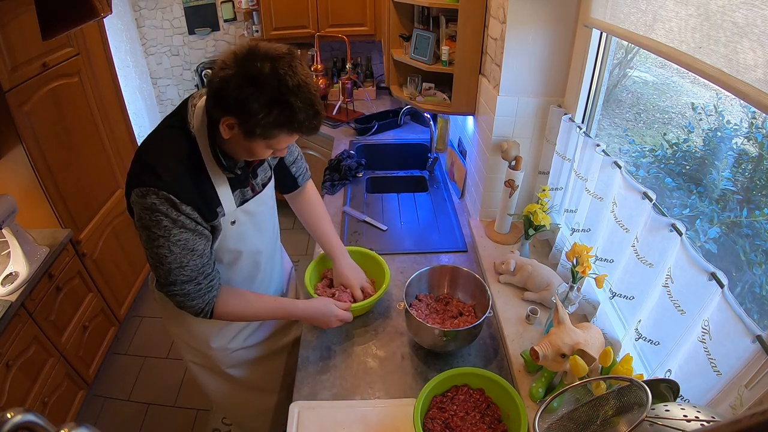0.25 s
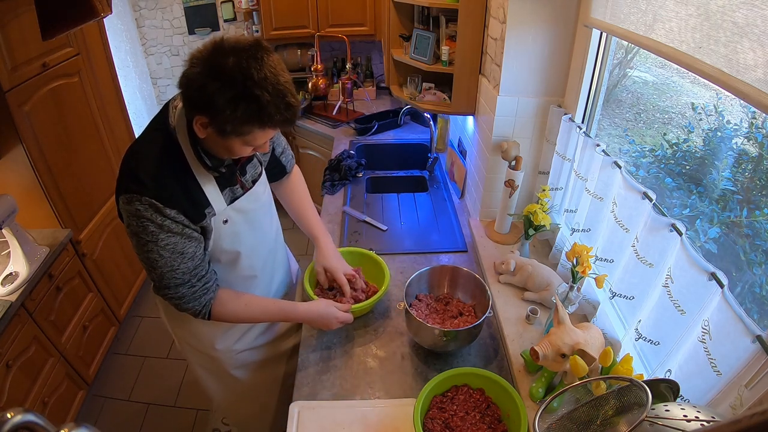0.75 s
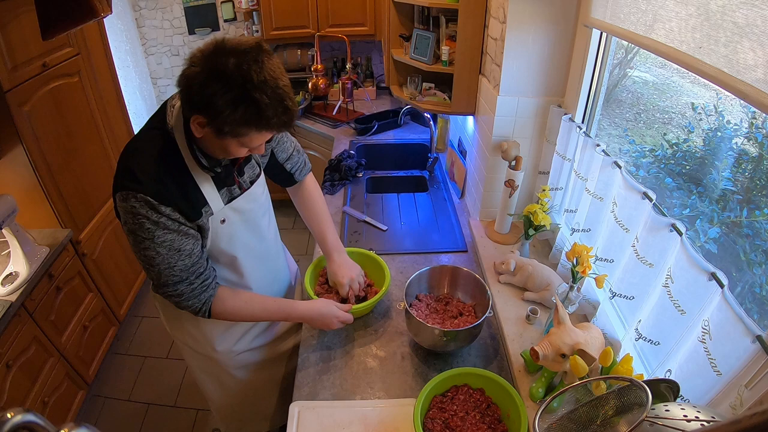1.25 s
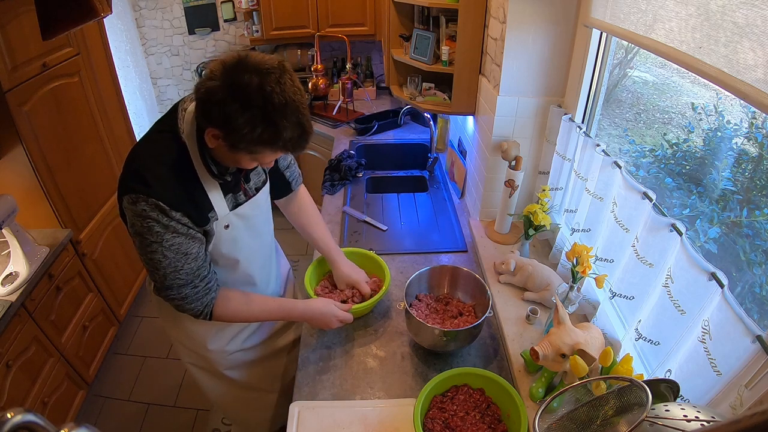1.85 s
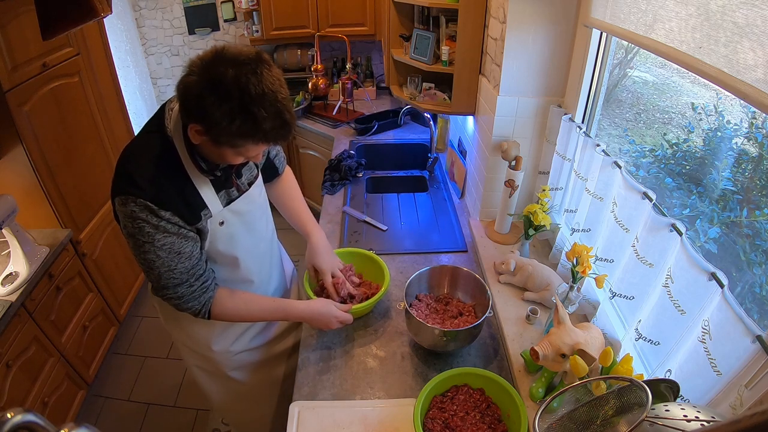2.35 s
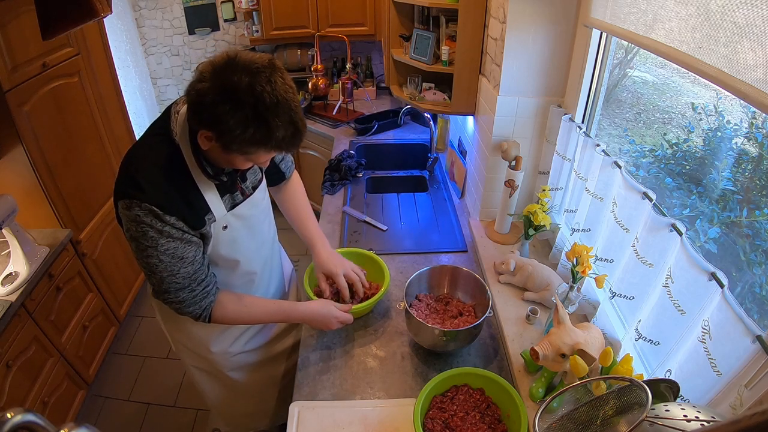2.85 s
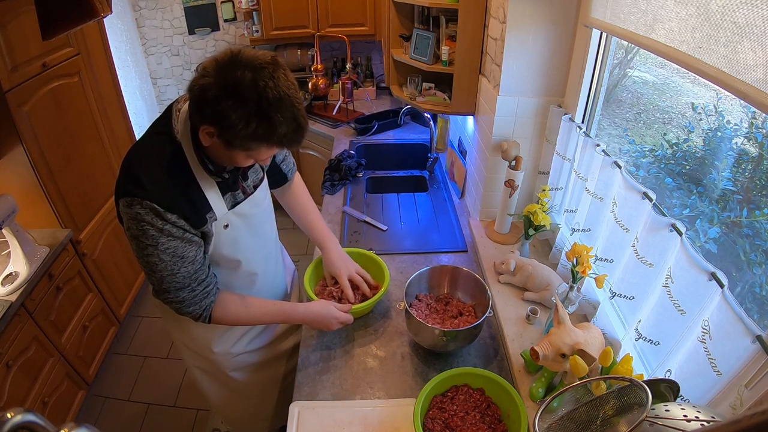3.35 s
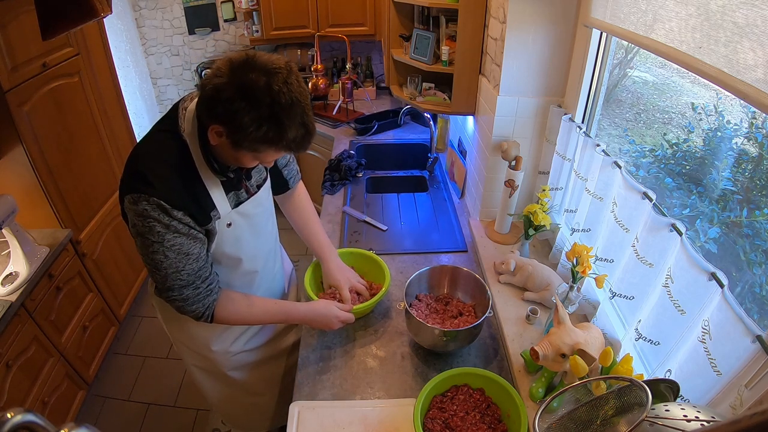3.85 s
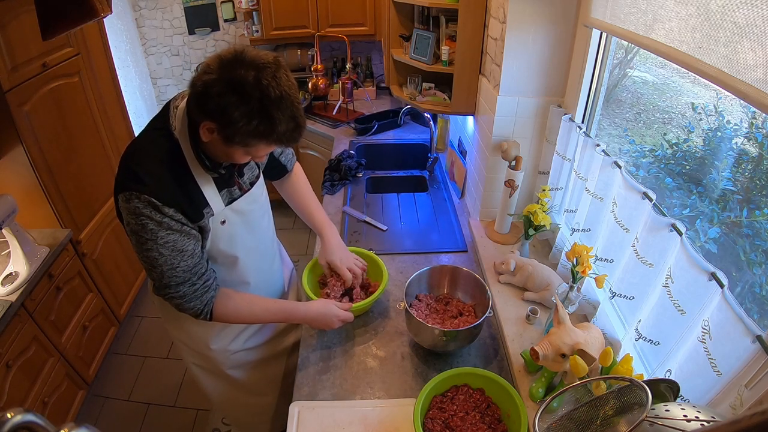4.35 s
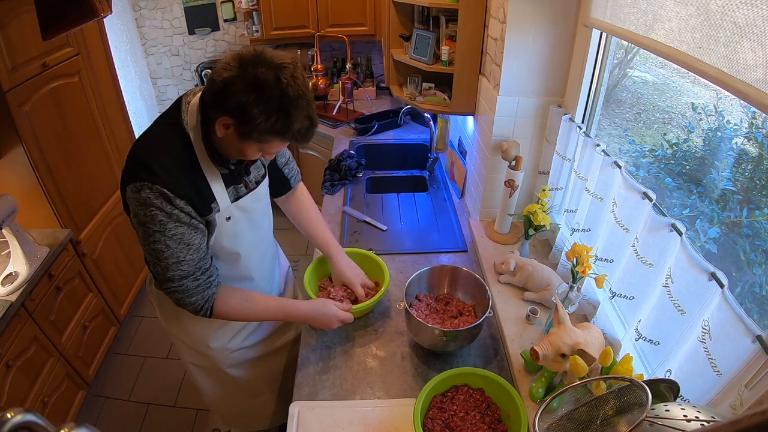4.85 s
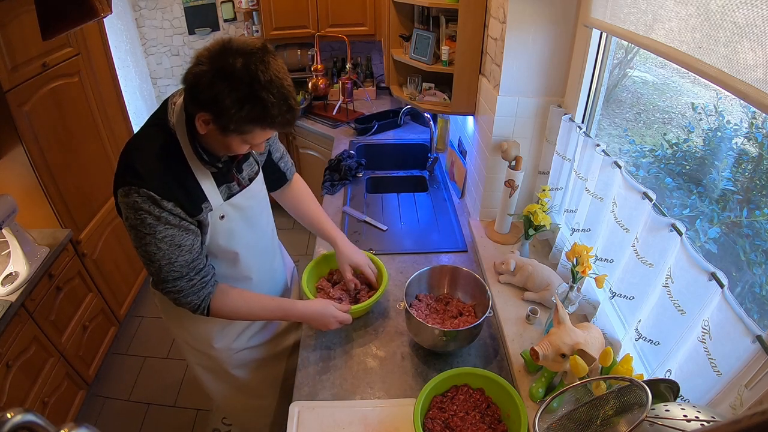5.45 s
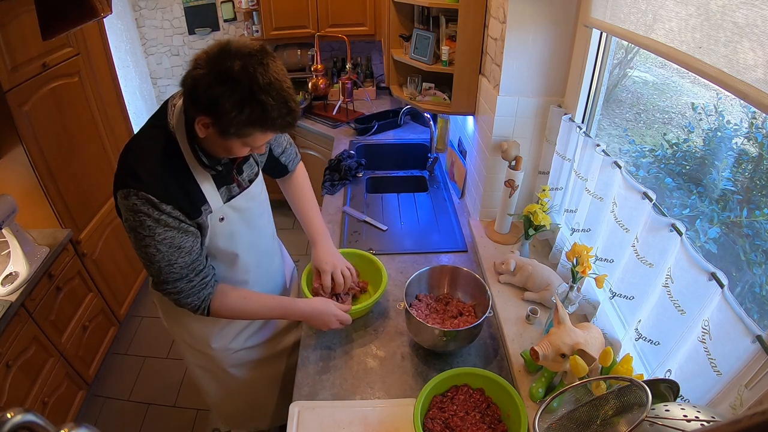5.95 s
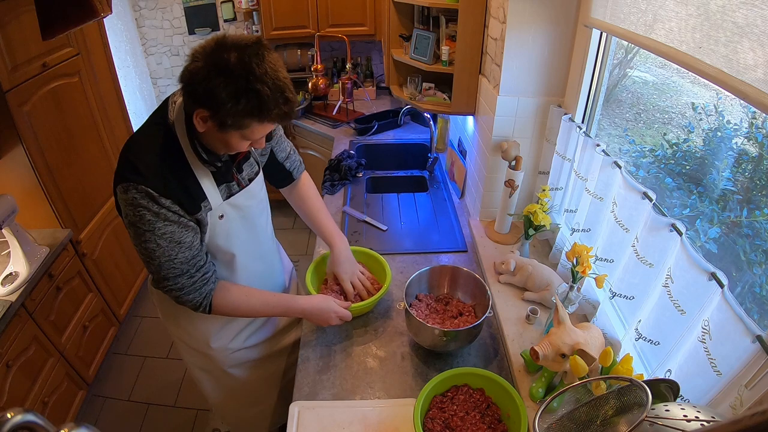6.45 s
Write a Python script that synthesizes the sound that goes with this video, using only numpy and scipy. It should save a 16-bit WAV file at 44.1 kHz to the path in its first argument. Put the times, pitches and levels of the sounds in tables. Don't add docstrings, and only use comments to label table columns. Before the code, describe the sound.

Close wet squishing and peeling of minced meat in a light plastic bowl that slides and knocks on a hollow kitchen worktop.

```python
import sys
import numpy as np
from scipy import signal
from scipy.fft import rfft, irfft, next_fast_len
from scipy.io import wavfile

SR = 44100
rng = np.random.default_rng(int(sys.argv[2]) if len(sys.argv) > 2 else 0)


def gain_from_db(level_db):
    decades = np.asarray(level_db, float) / 20
    return 10 ** decades


def persist_wave(psi):
    counts = np.round(np.clip(psi, -1, 1) * 32767).astype(np.int16)
    wavfile.write(sys.argv[1], SR, np.atleast_2d(counts).T)


N = 295460
SIZE = next_fast_len(N)
HZ = np.maximum(np.fft.rfftfreq(SIZE, 1 / SR), 1)


def rms_one(x):
    return x / np.sqrt(np.mean(x ** 2) + 1e-20)


def at_hz(points, hz):
    table_hz, value = np.array(points).T
    return np.interp(np.log(hz), np.log(table_hz), value)


def colour(x, gain):
    return irfft(rfft(x, SIZE) * gain, SIZE)[..., :N]


def drift(rate):
    knots = rng.standard_normal(int(N / SR * 200) + 2)
    place = np.arange(N) / SR * np.clip(rate, .1, 190)
    return np.interp(place, np.arange(len(knots)), knots)


def ring(force, hz, t60):
    r, w = gain_from_db(-60 / (t60 * SR)), 2 * np.pi * hz / SR
    return signal.lfilter([0, np.sin(w)], [1, -2 * r * np.cos(w), r * r], force + 1e-18)


def swells(start, hold, level_db, rise_s, fall_s):
    t = np.arange(0, N / SR + .002, .001)[:, None]
    early = np.maximum(start - t, 0) / np.maximum(rise_s, .002)
    late = np.maximum(t - start - np.maximum(hold, 0), 0) / np.maximum(fall_s, .002)
    gesture_db = np.maximum(level_db - 20 * (early + late), -130)
    power = np.sum(gain_from_db(gesture_db) ** 2, axis=1)
    return np.interp(np.arange(N) / SR, t[:, 0], 10 * np.log10(power))


# hz, side_minus_mid_db
WIDTH = [(60, -6), (130, 4), (290, 0), (640, 9), (1410, 1.5), (3100, -10.5), (6820, -1.5), (15000, -2)]
# hz, left_minus_right_db
LEAN = [(60, -.6), (250, -.8), (550, -2.5), (1200, -.8), (4500, -1.9), (9000, 1.8), (14000, .4)]


def two_ports(mid, side, width=WIDTH):
    side = colour(side, gain_from_db(at_hz(width, HZ)))
    lean = gain_from_db(at_hz(LEAN, HZ) / 2)
    return np.array([colour(mid + side, lean), colour(mid - side, 1 / lean)])


# start_s, hold_s, smack_db, squelch_below_smack_db, rise_s (per 20 dB)
PRESSES = [(0, 0.057, -61.5, -13.0, 0.796), (0.209, 0.038, -60.0, -12.5, 0.314),
           (0.282, 0.046, -51.0, -10.5, 0.07), (0.354, 0.037, -49.0, -9.5, 0.062),
           (0.422, 0.064, -55.0, -6.0, 0.146), (0.476, 0.037, -54.5, -4.5, 0.035),
           (0.547, 0.057, -60.0, -7.0, 0.035), (0.658, 0.139, -60.5, -12.0, 0.133),
           (0.999, 0.049, -60.0, -10.5, 0.055), (1.104, 0.074, -55.5, -4.5, 0.084),
           (1.214, 0.095, -58.5, -4.0, 0.065), (1.321, 0.058, -66.0, -6.0, 0.03),
           (1.441, 0.074, -63.0, -15.5, 0.225), (1.621, 0.027, -58.5, -12.0, 0.044),
           (1.693, 0.106, -59.5, -12.0, 0.053), (1.805, 0.046, -54.0, -5.0, 0.064),
           (1.892, 0.141, -57.5, -3.0, 0.118), (2.02, 0.08, -58.5, -6.0, 0.114),
           (2.203, 0.092, -60.5, -17.5, 0.05), (2.316, 0.041, -61.5, -15.0, 0.117),
           (3.342, 0.057, -79.5, -3.5, 0.347), (3.503, 0.055, -77.5, -7.5, 0.17),
           (3.739, 0.021, -61.0, -13.0, 0.009), (3.808, 0.029, -66.0, -11.0, 0.064),
           (3.89, 0.138, -58.5, -10.0, 0.032), (4.093, 0.166, -59.0, -7.5, 0.162),
           (4.376, 0.099, -60.5, -5.5, 0.368), (4.706, 0.041, -68.0, -19.0, 0.048),
           (4.754, 0.036, -61.5, -13.5, 0.031), (4.814, 0.079, -55.0, -8.5, 0.066),
           (4.961, 0.111, -58.5, -10.5, 0.085), (5.082, 0.101, -56.5, -6.0, 0.168),
           (5.241, 0.047, -62.0, -5.5, 0.081), (5.47, 0.031, -69.0, -5.5, 0.405),
           (5.582, 0.106, -61.5, -11.0, 0.049), (5.749, 0.084, -57.5, -6.0, 0.109),
           (5.899, 0.087, -60.0, -10.5, 0.182), (6.204, 0.031, -62.0, -10.5, 0.431),
           (6.257, 0.062, -51.0, -9.0, 0.122), (6.482, 0.111, -55.0, -4.0, 0.28)]
PRESS_FALL_S, SQUELCH_FALL_S = 0.14, 0.097
SQUELCH_RISE = 0.94
# start_s, hold_s, crackle_db, rise_s, fall_s (per 20 dB)
PEELS = [(0, 0.062, -59.5, 0.08, 0.15), (0.201, 0.015, -64.5, 0.04, 0.07), (0.24, 0.15, -57.0, 0.034, 0.07),
         (0.491, 0.046, -57.5, 0.505, 0.26), (0.624, 0.106, -58.0, 0.149, 0.16),
         (0.716, 0.057, -59.0, 0.02, 0.37), (0.989, 0.055, -65.0, 0.07, 0.3),
         (1.11, 0.003, -55.5, 0.065, 0.16), (1.35, 0.005, -56.0, 0.352, 0.19),
         (1.449, 0.037, -56.0, 0.079, 0.3), (1.655, 0.051, -61.5, 0.03, 0.08),
         (1.731, 0.053, -61.0, 0.025, 0.13), (1.806, 0.029, -56.5, 0.094, 0.18),
         (1.899, 0.091, -57.0, 0.08, 0.15), (2.033, 0.008, -54.0, 0.164, 0.29),
         (2.256, 0.068, -56.0, 0.159, 0.14), (2.317, 0.006, -55.0, 0.015, 0.14),
         (2.485, 0.006, -73.0, 0.029, 0.36), (2.992, 0.059, -85.5, 0.065, 0.04),
         (3.174, 0.009, -79.0, 0.072, 0.06), (3.331, 0.007, -75.5, 0.121, 0.1),
         (3.463, 0.046, -67.0, 0.199, 0.14), (3.741, 0.011, -69.0, 0.011, 0.13),
         (3.83, 0.012, -64.5, 0.055, 0.07), (3.89, 0.133, -60.0, 0.065, 0.25),
         (4.077, 0.205, -60.0, 0.151, 0.28), (4.411, 0.068, -57.5, 0.311, 0.16),
         (4.659, 0.02, -70.5, 0.009, 0.17), (4.703, 0.061, -66.5, 0.039, 0.1),
         (4.814, 0.05, -61.0, 0.076, 0.18), (4.877, 0.019, -56.5, 0.015, 0.07),
         (4.974, 0.007, -58.5, 0.174, 0.14), (5.077, 0.178, -59.5, 0.132, 0.1),
         (5.271, 0.112, -67.0, 0.038, 0.12), (5.452, 0.003, -70.5, 0.006, 0.12),
         (5.602, 0.158, -72.5, 0.065, 0.06), (5.716, 0.134, -66.5, 0.164, 0.42),
         (5.875, 0.13, -64.0, 0.083, 0.64), (6.281, 0.038, -58.5, 0.452, 0.44),
         (6.473, 0.143, -57.0, 0.05, 0.08)]
PEEL_SMACK_DB = -14
# squelch, smack and crackle below the crack, each level_db
SPLASH_DB = [-27.5, -25.5, -46]
SPLASH_FALL_S = 0.082
MEAT_TRIM_DB = [
    [-1.64],
    [-0.08],
    [-0.33],
]


def kneading():
    s, hold, smack_db, below_db, rise = np.transpose(PRESSES)
    squelch = swells(s, hold, smack_db + below_db, rise * SQUELCH_RISE, SQUELCH_FALL_S)
    smack = swells(s, hold, smack_db, rise, PRESS_FALL_S)
    crackle = swells(*np.transpose(PEELS))
    smack = 20 * np.log10(np.hypot(gain_from_db(smack), gain_from_db(crackle + PEEL_SMACK_DB)))
    hands = np.array([squelch, smack, crackle]) + MEAT_TRIM_DB
    s, crack_db = np.transpose(KNOCKS)[:2]
    splash = swells(s + 0.0025, 0, crack_db, 0.0015, SPLASH_FALL_S) + np.array(SPLASH_DB)[:, None]
    return 20 * np.log10(np.hypot(gain_from_db(hands), gain_from_db(splash)))


# hz, level_db (per Hz)
MINCE = [(470, 11), (800, -12), (1040, -8.5), (1130, -5.5), (1220, -9), (1410, -5), (1700, -6), (2050, -2),
         (5130, -2.5), (7260, 2), (8320, -4.5), (9650, -0.5), (11500, -19), (14200, -20.5), (15500, -15)]
HARDEST_SQUEEZE_DB = [
    [-52],
    [-48],
    [-52.5],
]


def mince(per_s=16000, spread_db=-0.6, patchy_db=0.73, lumpy_db=1.21):
    levels = np.minimum(kneading(), HARDEST_SQUEEZE_DB)
    sizes = gain_from_db(spread_db * np.minimum(rng.exponential(1, (2, N)), 5)) * rng.standard_normal((2, N))
    happens = rng.random((2, N)) < per_s / SR
    snaps = rfft(sizes * happens, SIZE) * gain_from_db(at_hz(MINCE, HZ)) * (HZ > 700)

    whole = irfft(snaps[0], SIZE)
    ranges_hz = [(950, 1700), (1900, 4500), (5000, 14000)]
    refs = [np.std(colour(whole, (HZ > lo) & (HZ < hi))) for lo, hi in ranges_hz]
    levels = levels - 20 * np.log10(refs)[:, None]

    lumps = drift(70) + 0.76 * drift(140)
    octave = np.log2(HZ / 800)
    out = 0
    for step in np.arange(0, 4.5, .5):
        place = np.interp(800 * 2 ** step, [1500, 2200, 3600, 6000], [0, 1, 1, 2])
        low = min(int(place), 1)
        level_db = levels[low] + (place - low) * (levels[low + 1] - levels[low])
        swell = gain_from_db(level_db + patchy_db * drift(35) + lumpy_db * lumps)
        mask = np.cos(np.pi * np.clip(octave - step, -.5, .5)) ** 2
        out = out + swell * irfft(snaps * mask, SIZE)[:, :N]
    return two_ports(*out)


# start_s, peak_db, pitch_hz
CLICKS = [(0.2369, -43, 3860), (0.3581, -27.5, 2070), (.357, -25, 2840), (0.4743, -41, 2500),
          (0.4838, -32, 2340), (0.6174, -43, 3370), (0.6559, -33, 7120), (0.7234, -52, 6540),
          (0.8874, -39.5, 7400), (0.9916, -44, 2620), (1.1114, -36, 6360), (1.115, -27.5, 10240),
          (1.3444, -36, 7800), (1.6616, -39, 6230), (1.955, -42, 7090), (1.9809, -43, 7600),
          (1.6162, -41.5, 2450), (1.6437, -43, 2280), (1.8038, -37, 2330), (2.1924, -46, 3550),
          (2.2134, -41, 4400), (2.3211, -35, 5200), (2.325, -31.5, 7270), (2.338, -44, 8000),
          (3.1094, -58, 8400), (3.1697, -56, 9170), (3.3253, -62, 7800), (3.3927, -60, 6780),
          (3.4431, -49, 6940), (3.5384, -59, 2130), (3.7434, -41, 2500), (3.8307, -49, 7190),
          (3.837, -49, 6800), (3.886, -47, 7280), (4.1629, -41, 7510), (3.8856, -53, 3420),
          (4.6154, -50, 6820), (4.6623, -52, 5240), (4.7052, -52, 3800), (4.7426, -55, 2000),
          (4.806, -49, 5100), (4.8783, -39, 7760), (4.896, -41, 10000), (4.9621, -37.5, 3260),
          (5.455, -55, 2680), (5.4964, -50, 2180), (5.5648, -47.5, 2050), (5.5862, -48, 2580),
          (5.6585, -47, 2000), (5.7473, -38, 2130), (5.8804, -43, 3420), (6.3091, -40, 6980),
          (6.333, -43, 6760), (4.3248, -23.0, 3270), (4.3284, -21.0, 2700), (6.461, -27, 3900),
          (6.4643, -27, 3700), (6.4657, -25, 6300), (6.4625, -34, 9300), (6.462, -24.5, 5200),
          (6.465, -29, 2550), (5.456, -56, 5150)]
CLICK_LEAN_DB = -1.3
PORT_HIGH_HZ = 10000


def wet_clicks():
    out, t = np.zeros((2, N)), np.arange(600) / SR
    lean = gain_from_db(CLICK_LEAN_DB / 2 * np.array([[1], [-1]]))
    ticks = rng.standard_normal((len(CLICKS), len(t)))
    for (s, peak_db, hz), tick in zip(CLICKS, ticks):
        tick = signal.lfilter(*signal.butter(2, .6 * hz, "high", fs=SR), tick)
        cycles = np.sin(2 * np.pi * hz * t) * np.exp(-t * hz / 6.0)
        pop = cycles + 0.27 * tick * np.exp(-t / 0.0012)
        at = round(s * SR)
        out[:, at:at + len(t)] += gain_from_db(peak_db - 4.0) * pop * lean
    band = signal.butter(5, [1200, PORT_HIGH_HZ], "band", fs=SR, output="sos")
    return signal.sosfilt(band, out)


# start_s, crack_db, base_db, wall_db
KNOCKS = [(0.2434, -57, -72, -79), (0.2784, -36, -59, -56), (0.2945, -50, -64, -52),
          (0.3555, -31.5, -49, -53), (0.372, -32, -54, -69), (0.4743, -41, -68, -50),
          (0.9869, -49, -67, -67), (1.0963, -43, -55, -53), (1.111, -41, -45, -50), (1.6121, -61, -62, -58),
          (1.802, -40, -69, -73), (1.9714, -50, -84, -56), (3.737, -61, -66, -72),
          (3.7434, -61, -53.5, -59), (3.9053, -41, -58.5, -67), (4.312, -60, -47, -53),
          (4.3245, -16.5, -22, -26.5), (4.334, -54, -30, -35), (4.3594, -46, -31.5, -39),
          (4.405, -47, -44, -46), (4.4394, -54, -41, -40), (4.7855, -45, -54, -68),
          (5.0366, -39, -66, -51.5), (5.1034, -39, -51, -69), (5.2545, -43, -47, -54),
          (5.3882, -51, -55, -38.5), (5.404, -70, -67, -56), (5.417, -75, -78, -51), (5.429, -81, -79, -64),
          (5.44, -71, -72, -63), (5.474, -65, -85, -75), (5.5034, -60, -83, -52), (5.5662, -58, -50, -56),
          (5.7465, -33, -47, -41), (5.78, -52, -54, -48), (6.1502, -61, -55, -74), (6.24, -51, -45, -48.5),
          (6.4611, -22, -46.5, -35), (6.478, -40, -45.5, -43), (6.494, -49, -65, -51),
          (6.5754, -58, -68, -46)]
# hz, level_db (per Hz)
CRACK = [(900, 10), (1400, -23), (2000, -5), (3000, 4), (4200, -2.5), (7000, -2), (10000, -89),
         (12000, -61)]


def cracks(burst_s=0.0028):
    out, t = np.zeros(N), np.arange(1300) / SR
    shape = (len(KNOCKS), len(t))
    ticks = rng.standard_normal(shape) * gain_from_db(4.8 * rng.standard_normal(shape))
    burst = np.exp(-(t / burst_s) ** 0.53) * np.minimum(t / 0.00097, 1)
    for row, tick in zip(KNOCKS, ticks):
        at = round(row[0] * SR)
        out[at:at + len(t)] += gain_from_db(row[1] - 11.5) * tick * burst
    return colour(out, gain_from_db(at_hz(CRACK, HZ)) * (HZ > 700))


def tuned(hz, rows):
    return [(f, *row) for f, row in zip(hz, rows)]


def body(modes, knocks, column, drag_db, contact_s, after_db, after_t60, scatter_db, stagger, reach=0.994):
    rows = np.array(knocks)
    at = np.round(rows[:, 0] * SR).astype(int)
    stutter = rng.standard_normal((2, N)) * gain_from_db(4.8 * drift(60))
    struck, murmur = np.zeros((2, N)), np.zeros((2, N))
    for hz, level_db, t60 in modes:
        chance = rng.random((len(rows), 5))
        strength = gain_from_db(rows[:, column] + level_db + scatter_db * 7.0 * (chance[:, 2] - 1.0))
        late = (chance[:, :2] * np.clip(stagger, 0, 1) * SR / hz).astype(int)
        force = np.zeros((2, N))
        force[0, at + late[:, 0]] = strength
        force[1, at + late[:, 1]] = strength * np.sign(chance[:, 3] - .5)
        struck += ring(force, hz, t60)
        murmur += gain_from_db(level_db) * ring(stutter, hz, t60 * 0.82) / t60 ** 0.14

    push = np.hanning(max(int(contact_s * SR), 3))
    struck = signal.lfilter(push / push.sum(), 1, struck)
    blows = np.zeros(N)
    blows[at] = gain_from_db(rows[:, column] + after_db)
    shudder = signal.lfilter([1], [1, -gain_from_db(-60 / (after_t60 * SR))], blows)
    shudder = signal.lfilter([.004], [1, -.996], shudder)
    whole = struck + np.hypot(gain_from_db(drag_db), shudder) * rms_one(murmur)
    edges = [modes[0][0] * 0.83, modes[-1][0] * reach]
    return signal.sosfilt(signal.butter(3, edges, "band", fs=SR, output="sos"), whole)


# start_s, hold_s, wall_db, base_db, worktop_db
SLIDES = [(0.0, 0.34, -80.5, -75, -73), (0.303, 0.11, -53.5, -58.5, -73), (.38, .0, -51, -63, -72),
          (0.464, 0.15, -65, -70, -81), (0.686, 0.11, -77, -74, -91), (1.042, 0.0025, -68, -70, -78),
          (1.143, 0.059, -60.5, -62.5, -54.5), (1.322, 0, -70, -64.5, -89),
          (1.728, 0.0019, -71.5, -65, -85), (1.87, 0.29, -72, -75, -75), (3.51, 0.18, -99, -92, -75),
          (3.78, 0.065, -69, -74, -76), (3.908, 0.32, -72, -78, -83), (4.355, 0.16, -59, -63, -54),
          (4.817, 0.066, -62.5, -65, -71), (5.054, 0.028, -60, -72, -80), (5.11, 0.061, -64, -60, -81),
          (5.373, 0.23, -66.5, -74, -71), (5.665, 0.067, -72, -67, -63), (5.769, 0.084, -58, -69, -69),
          (6.197, 0.1, -66, -75, -66), (6.24, 0.04, -55.5, -52, -60), (6.282, 0.078, -61.5, -56, -50.5),
          (6.49, .0, -52, -64, -60), (6.562, 0.071, -64, -67.5, -71)]


def slides():
    s, hold, *levels = np.transpose(SLIDES)
    return [swells(s, hold, db, rise_s=0.088, fall_s=0.11) for db in levels]


# pitch_hz; then level_db, t60_s
BASE_HZ = [205, 248, 272, 317, 345, 357, 393, 425]
BASE = [(-10, 0.19), (-6.5, .2), (-3, 0.33), (-4.5, 0.19), (-7.5, 0.33), (-5, 0.19), (-5, 0.35),
        (-12, 0.091)]
BOWL_HZ = [600, 628, 654, 678, 700, 724, 762, 826, 885, 942, 1012]
BOWL = [(-15, .12), (-9, 0.27), (-9, 0.13), (-1.5, 0.18), (0, 0.062), (-3, 0.18), (-2, 0.13), (-10.5, 0.2),
        (-16.5, 0.38), (-13, 0.18), (-8, .12)]
RIM_HZ = [1210, 1380, 1690, 1990, 2205, 2450, 2590, 2840, 3240, 3490]
RIM = [(-23, 0.059), (-23, 0.099), (-24, 0.099), (-11, 0.048), (-14.5, 0.087), (-15, 0.048), (-17, 0.032),
       (-14.5, 0.057), (-14.5, 0.064), (-16, 0.034)]
RIM_RUB_DB = -9.5


def bowl(wall_db, base_db):
    rub_db = kneading()[1] + RIM_RUB_DB
    base = body(tuned(BASE_HZ, BASE), KNOCKS, column=2, drag_db=base_db, contact_s=0.00059,
                after_db=-11.5, after_t60=0.34, scatter_db=1.6, stagger=0.51)
    wall = body(tuned(BOWL_HZ, BOWL), KNOCKS, column=3, drag_db=wall_db, contact_s=0.00096,
                after_db=-9.5, after_t60=0.24, scatter_db=1.2, stagger=0.64)
    rim = body(tuned(RIM_HZ, RIM), KNOCKS, column=1, drag_db=rub_db, contact_s=0.0001,
               after_db=-20.5, after_t60=0.16, scatter_db=2.0, stagger=1.0)
    return base + wall + rim


# start_s, cabinet_db, worktop_db
THUDS = [(0.2432, -39, -55.5), (0.2773, -61, -58), (0.292, -45, -57), (0.358, -69, -50.5),
         (0.475, -87, -66), (1.0941, -42, -44.5), (1.613, -43.5, -55), (1.7904, -39, -55.5),
         (3.739, -57, -66.5), (3.9056, -60, -60), (4.325, -16.5, -27.5), (4.3586, -47, -28.5),
         (4.401, -54, -41), (4.4399, -49, -44), (4.58, -57, -72), (5.253, -75, -58), (5.5624, -54, -59),
         (5.7467, -49, -54), (6.154, -34, -42.5), (6.243, -68, -43.5), (6.4608, -62, -66),
         (6.579, -61, -75)]
# pitch_hz, level_db, t60_s
CABINET = [(63, -14, .12), (80, -2, .22), (97, -14, .12)]
CABINET_DRAG_DB = -15
# pitch_hz; then level_db, t60_s
WORKTOP_HZ = [127.5, 153, 182]
WORKTOP = [(1.5, 0.24), (3.5, 0.5), (-13, 0.43)]


def furniture(top_db):
    cabinet = body(CABINET, THUDS, column=1, drag_db=top_db + CABINET_DRAG_DB, contact_s=0.0015,
                   after_db=-11.0, after_t60=0.24, scatter_db=3.0, stagger=0.12, reach=3.6)
    worktop = body(tuned(WORKTOP_HZ, WORKTOP), THUDS, column=2, drag_db=top_db, contact_s=0.0039,
                   after_db=-6.5, after_t60=0.27, scatter_db=1.25, stagger=0.13, reach=1.54)
    return cabinet + worktop


# start_s, level_db
RATTLES = [(.28, -67), (.366, -43), (.385, -44), (.48, -67), (1.1, -49), (1.8, -68), (3.745, -64),
           (4.328, -30), (4.345, -30), (4.44, -46), (4.8, -57), (5.1, -67), (5.39, -51), (5.428, -48),
           (5.75, -47), (6.245, -55), (6.295, -44), (6.33, -46), (6.465, -42), (6.485, -39), (6.56, -51)]
# pitch_hz; then level_db, t60_s
DOOR_HZ = [495, 538, 562]
DOOR = [(-18.5, 0.081), (3.5, 0.18), (-24, 0.042)]
DOOR_DRAG_DB = -4.5


def cupboard_door(wall_db):
    return body(tuned(DOOR_HZ, DOOR), RATTLES, column=1, drag_db=wall_db + DOOR_DRAG_DB, contact_s=0.0015,
                after_db=-9.0, after_t60=0.21, scatter_db=0.5, stagger=0.3)


ROOM_T60_S, ROOM_DB, MINCE_ROOM_DB = 0.23, -9, -13


def kitchen(x):
    t = np.arange(SR // 2) / SR
    tail = rng.standard_normal((2, len(t))) * gain_from_db(-60 * t / ROOM_T60_S) * (t > .004)
    dull = signal.lfilter([.3], [1, -.7], tail)
    tail = dull + (tail - dull) * np.exp(-t / 0.0059)
    tail = tail / np.sqrt(np.sum(tail[0] ** 2))
    return signal.fftconvolve(np.atleast_2d(x), tail, axes=1)[:, :N]


# hz, level_db (per Hz)
QUIET = [(15, -41), (25, 9), (86, -15.5), (132, -3.5), (183, -0.5), (253, -4), (305, -1.5), (349, -5.5),
         (508, -16), (761, -6.5), (1050, -15.5), (1530, -17.5), (2200, -19), (3200, -21.5), (9270, -28),
         (15500, -44)]
QUIET_DB = -71
# pitch_hz, level_db (rms)
HUM = [(100, -82), (200, -82), (300, -77.5)]


def fridge():
    noise = colour(rng.standard_normal((2, N)), gain_from_db(at_hz(QUIET, HZ)))
    hiss = gain_from_db(QUIET_DB) * rms_one(noise)
    t = np.arange(N) / SR
    hum = np.zeros(N)
    for hz, db in HUM:
        hum += np.sqrt(2) * gain_from_db(db + 1.06 * drift(27)) * np.sin(2 * np.pi * hz * t)
    return two_ports(hiss[0] + hum, hiss[1])


# hz, side_minus_mid_db
WOOD_WIDTH = [(60, -21), (130, -23), (250, -24), (400, -17), (550, -7), (900, -6), (2200, -8)]


def scene():
    wall_db, base_db, top_db = slides()
    meat = mince()
    sharp = wet_clicks() + cracks() * gain_from_db([[-.7], [.7]])
    ringing = bowl(wall_db, base_db) + furniture(top_db) + cupboard_door(wall_db)
    echoes = kitchen(gain_from_db(ROOM_DB) * sharp + gain_from_db(MINCE_ROOM_DB) * meat)
    return meat + sharp + two_ports(*ringing, width=WOOD_WIDTH) + echoes + fridge()


def low_pass(x):
    return signal.sosfilt(signal.butter(12, 15610, fs=SR, output="sos"), x)


PORT_LOW_HZ = 47


def record(dry):
    bass_cut = signal.butter(4, PORT_LOW_HZ, "high", fs=SR, output="sos")
    top_cut = signal.cheby2(10, 50, 16200, fs=SR, output="sos")
    mix = signal.sosfilt(np.vstack([bass_cut, top_cut]), dry)
    return low_pass(mix)


dry = scene()
out = record(dry)
persist_wave(out)
```